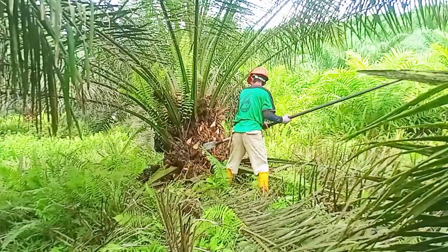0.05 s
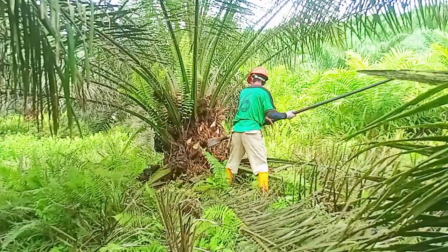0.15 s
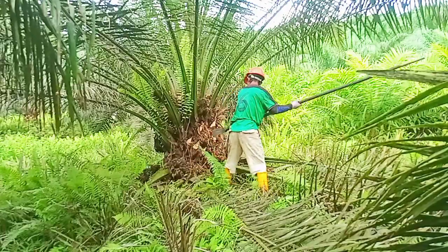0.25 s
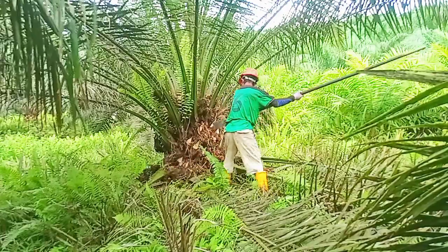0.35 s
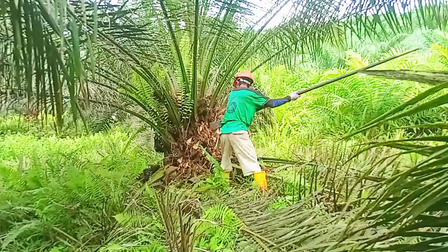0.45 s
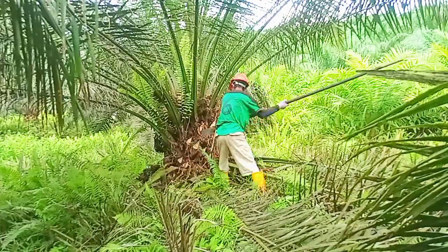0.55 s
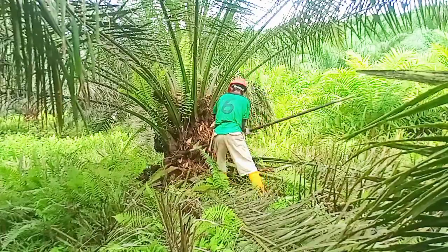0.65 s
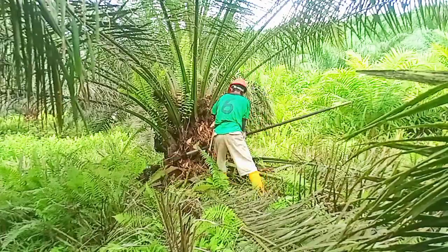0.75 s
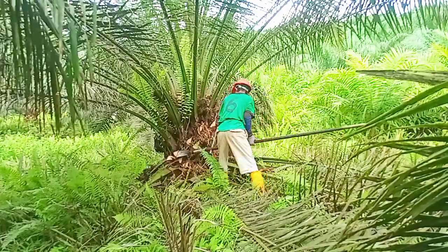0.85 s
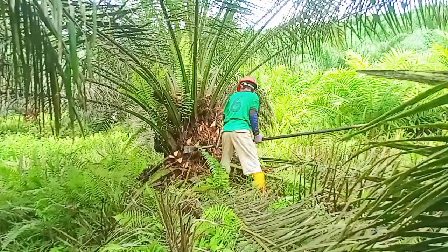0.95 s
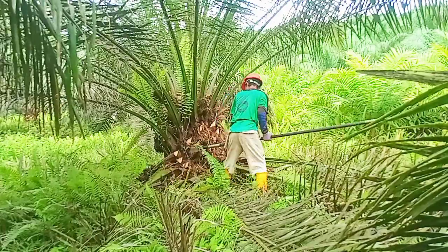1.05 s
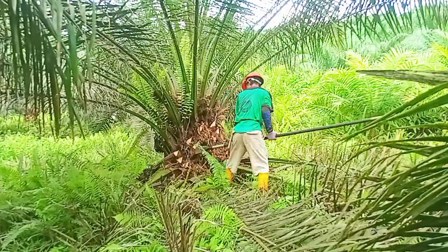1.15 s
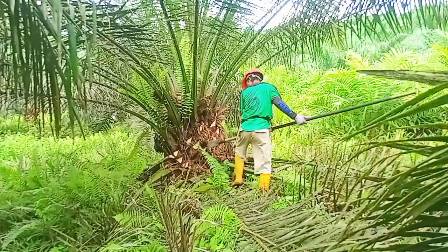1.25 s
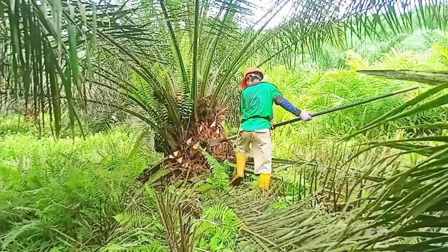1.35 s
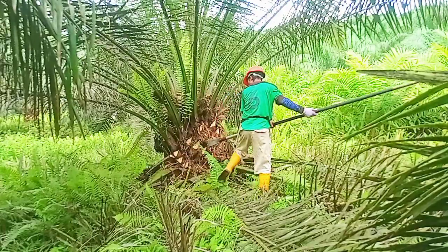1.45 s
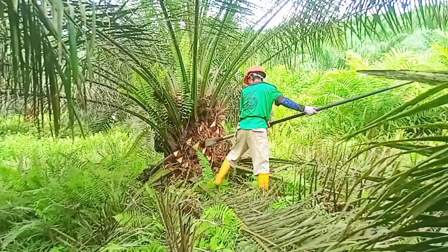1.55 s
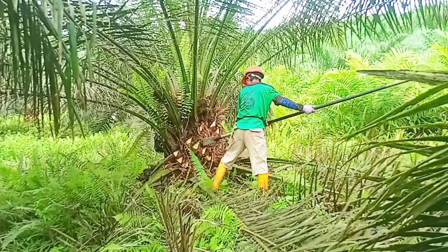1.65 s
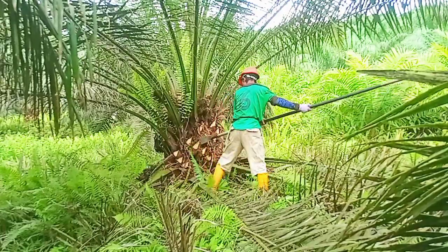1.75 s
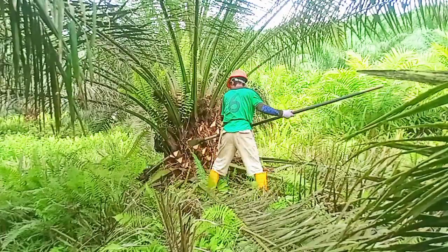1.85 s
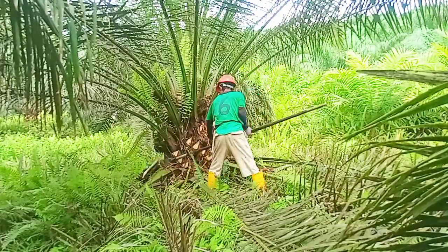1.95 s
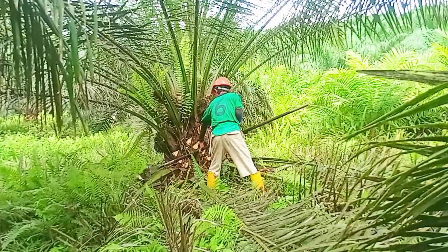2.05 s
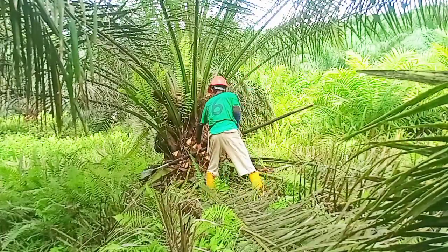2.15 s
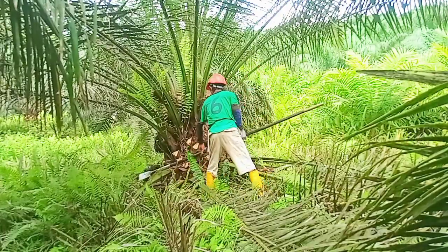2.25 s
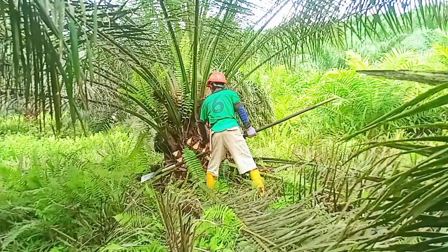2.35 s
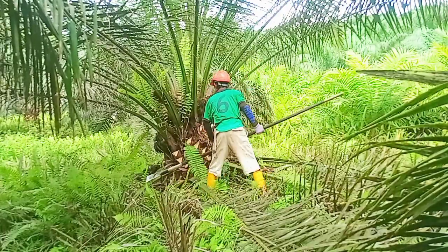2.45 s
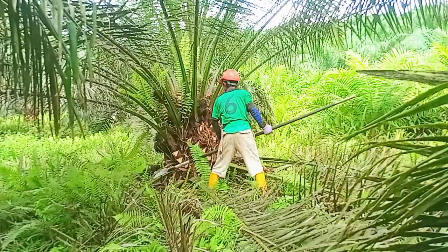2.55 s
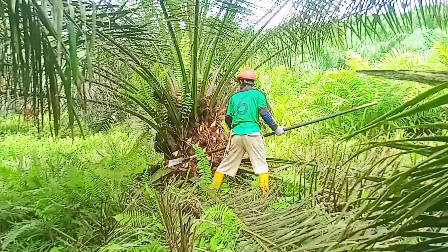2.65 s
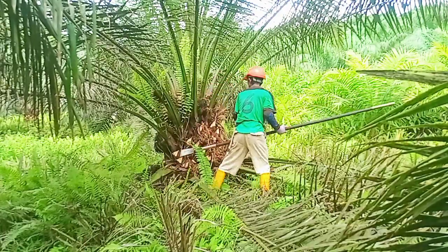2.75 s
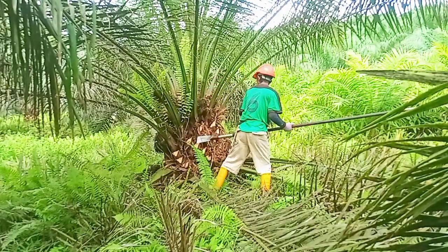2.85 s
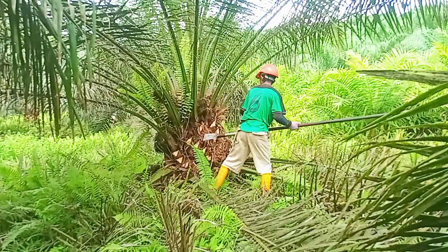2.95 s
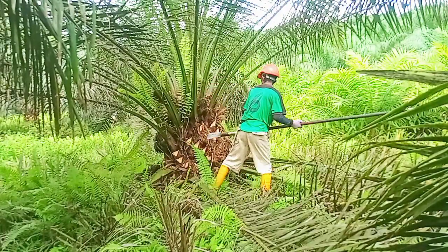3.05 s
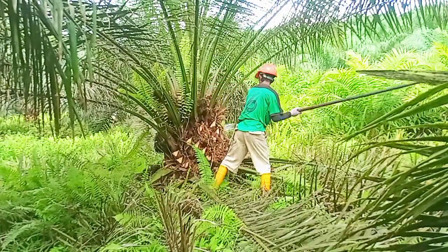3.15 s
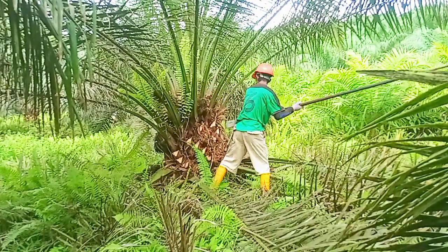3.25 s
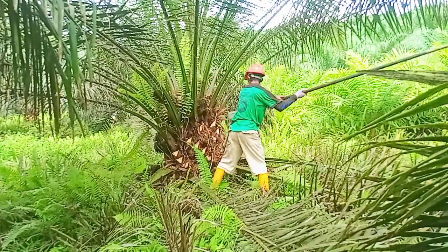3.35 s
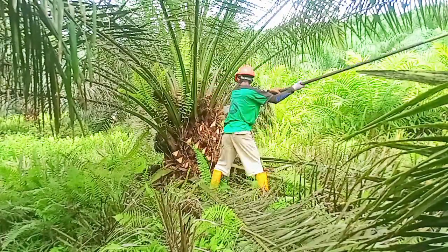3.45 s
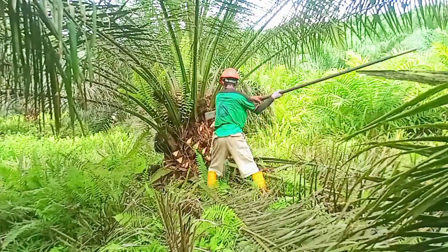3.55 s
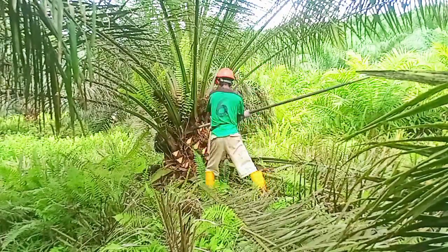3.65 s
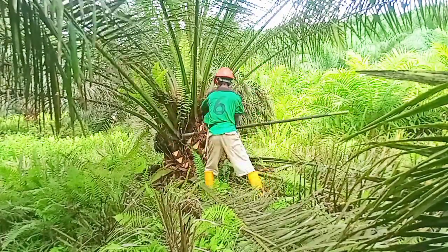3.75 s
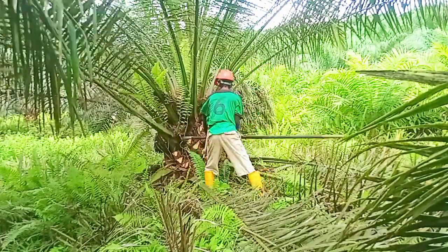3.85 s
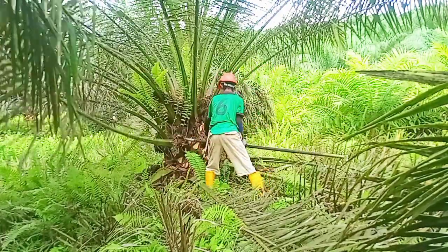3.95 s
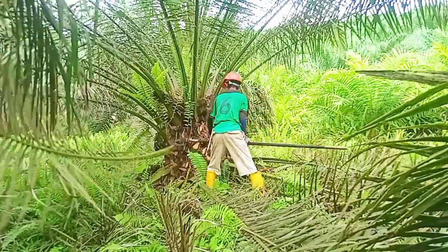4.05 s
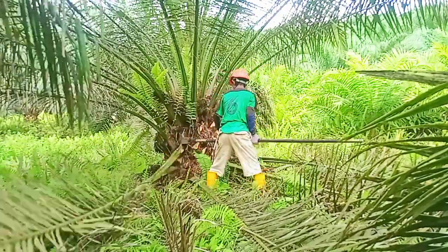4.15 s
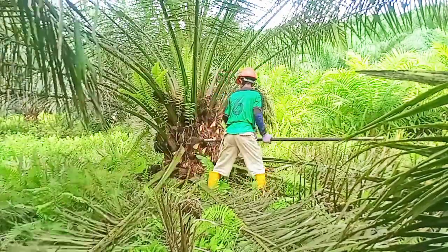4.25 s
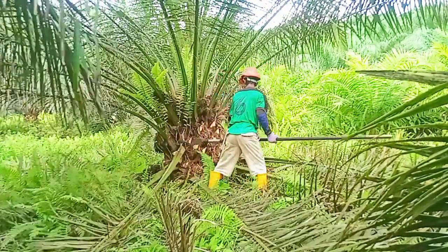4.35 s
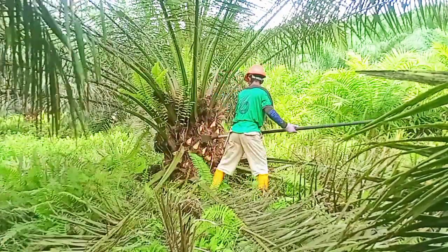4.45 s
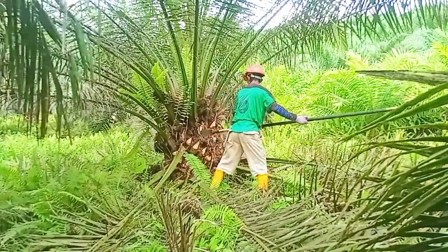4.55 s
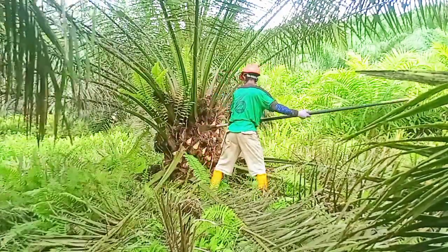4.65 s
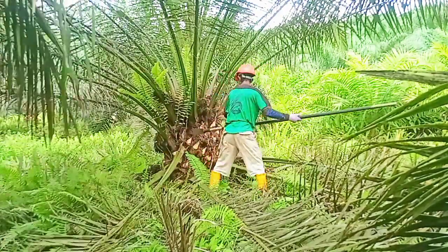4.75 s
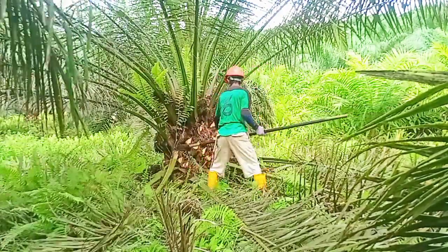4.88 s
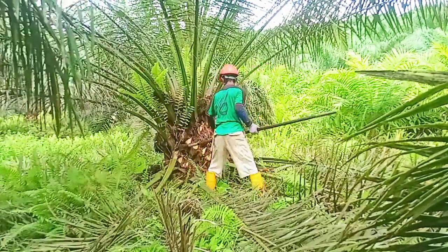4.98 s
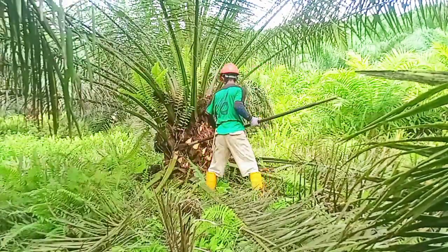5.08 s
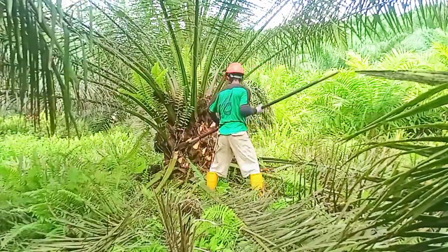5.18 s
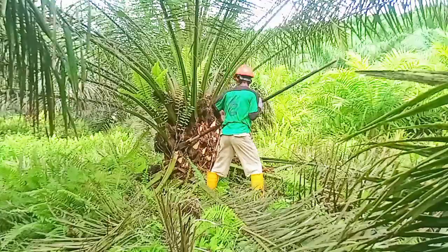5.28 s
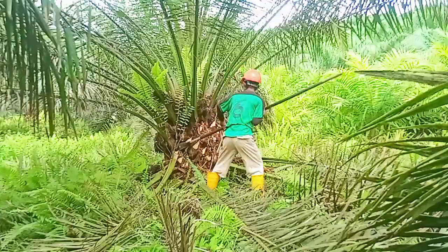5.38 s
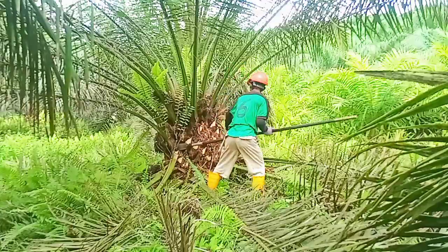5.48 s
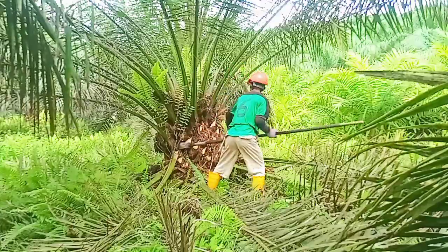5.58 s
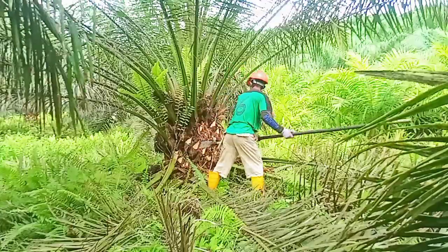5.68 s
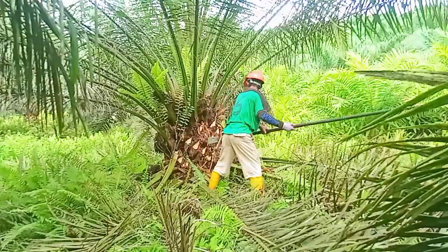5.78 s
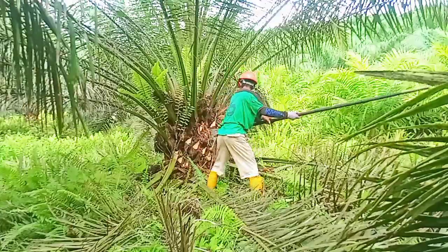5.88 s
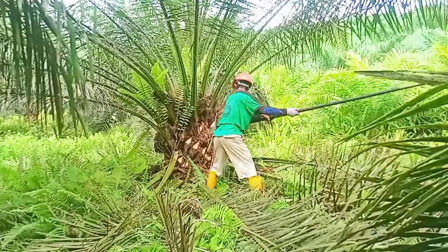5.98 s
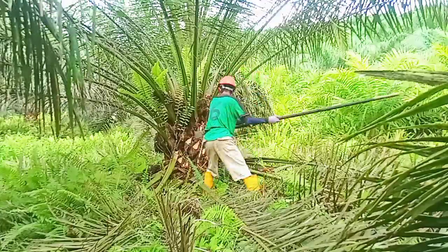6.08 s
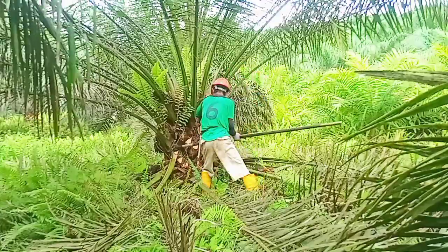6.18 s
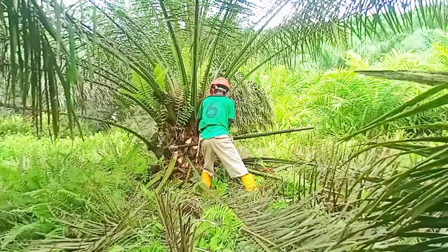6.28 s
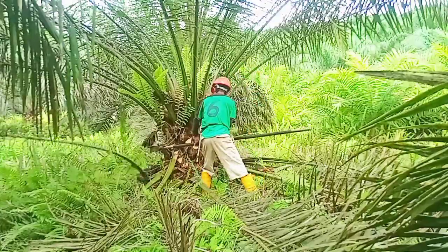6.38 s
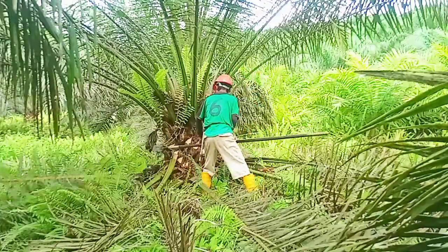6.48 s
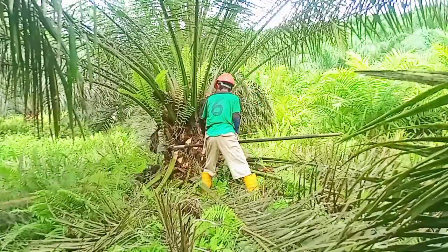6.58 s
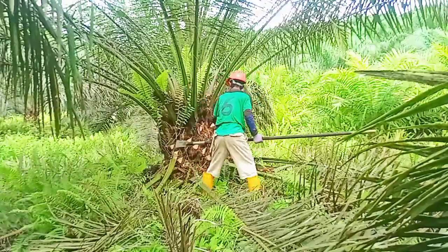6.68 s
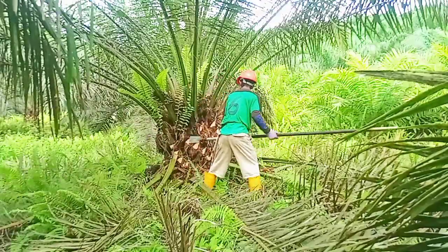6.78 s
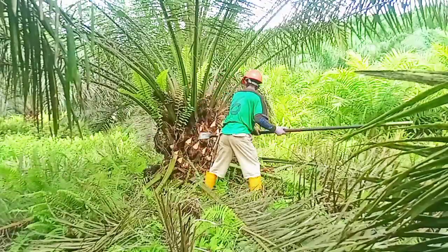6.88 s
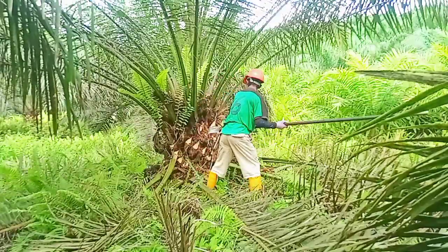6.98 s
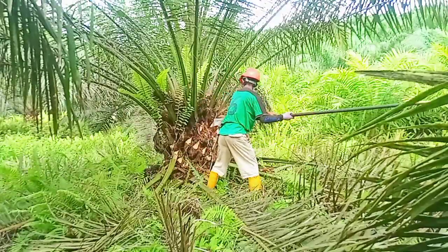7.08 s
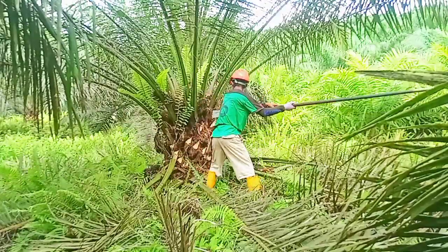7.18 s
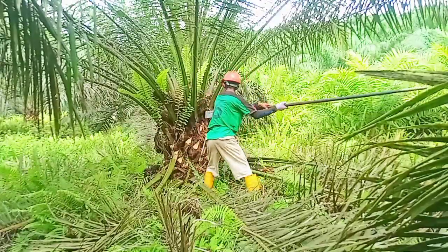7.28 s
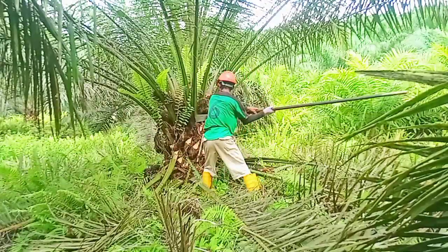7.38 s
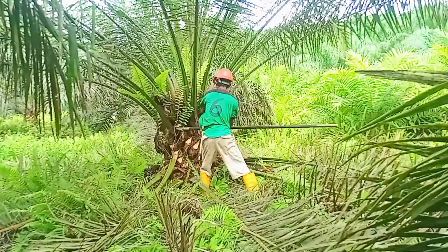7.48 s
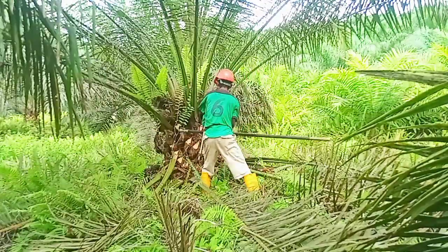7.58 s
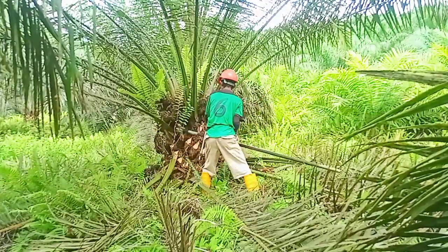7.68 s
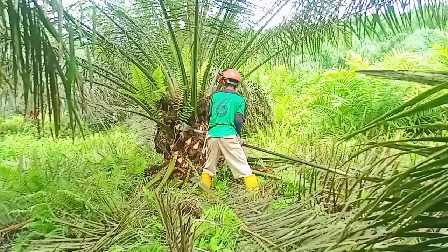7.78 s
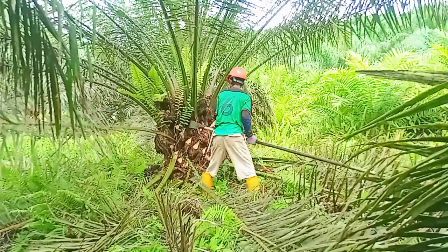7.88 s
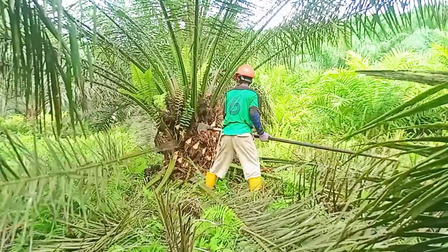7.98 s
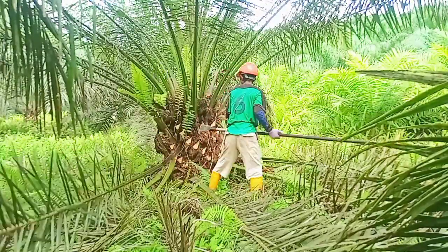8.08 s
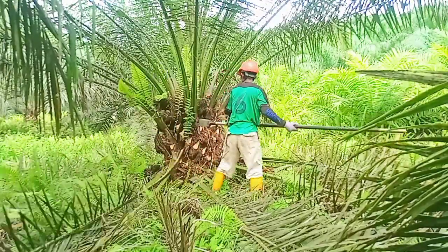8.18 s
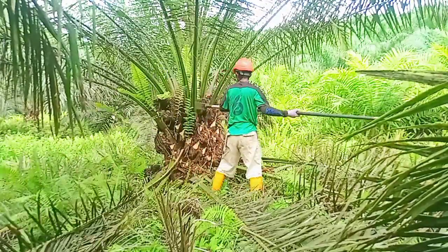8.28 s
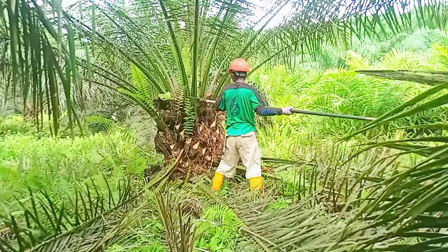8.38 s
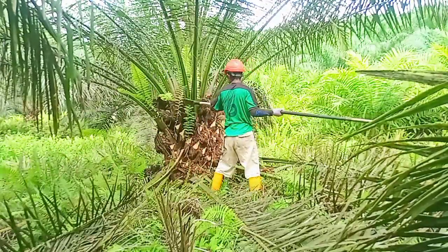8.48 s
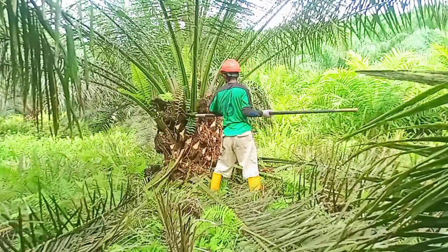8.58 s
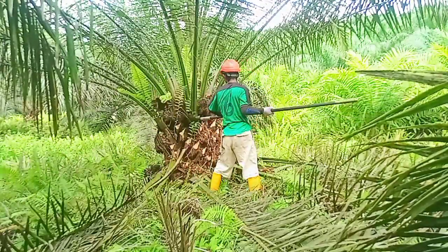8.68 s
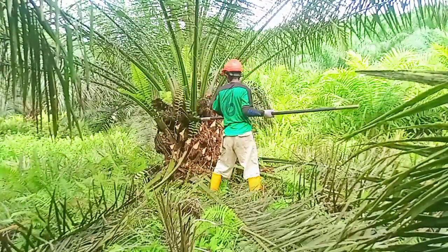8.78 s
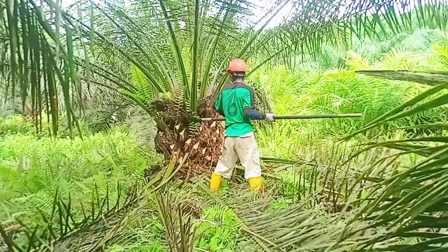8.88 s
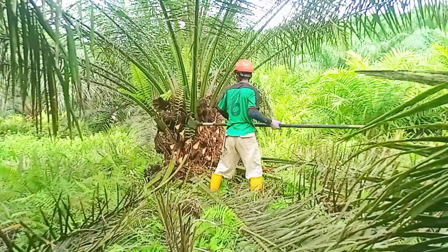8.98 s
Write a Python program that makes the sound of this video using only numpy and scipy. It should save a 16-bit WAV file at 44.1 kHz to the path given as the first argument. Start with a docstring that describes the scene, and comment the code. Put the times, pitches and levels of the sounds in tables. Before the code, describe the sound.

A long-handled steel chisel chops crunchily into woody palm fronds while insects buzz shrilly; cut fronds crackle and crash into undergrowth.

```python
"""Insects buzz steadily, some in a wavering trill, over a faint wash of air in an oil-palm plantation.
Leaves brush and slide, dry ribs snap, then a worker's long-pole chisel jabs the frond bases: noise bursts
for torn fibres, resonant knocks for the stalk. Decaying sines ring the steel; low swings thud as stubs bump.
Later a bird's gliding sines call far away, and cut fronds, as shaped crackle, crash into the ferns."""
import sys
import numpy as np
from scipy import signal
from scipy.fft import rfft, irfft, next_fast_len
from scipy.io import wavfile

SR = 44100
rng = np.random.default_rng(int(sys.argv[2]) if len(sys.argv) > 2 else 0)


def pcm_store(signal):
    """Save signal as 16-bit PCM."""
    levels = np.round(np.clip(np.atleast_2d(signal), -1, 1) * 32767)
    wavfile.write(sys.argv[1], SR, levels.astype(np.int16).T)


N = 398223
T = np.arange(N) / SR  # s


def amp(db):
    """Decibels to gain."""
    return 10 ** (np.asarray(db) / 20)


def evened(x):
    """Scales to rms 1."""
    return x / np.sqrt(np.mean(x ** 2) + 1e-20)


def read(points, hz):
    """Interpolates a spectrum on a log-frequency axis."""
    f, value = np.transpose(points)
    return np.interp(np.log(hz + 1), np.log(f + 1), value)


def shaped(x, gain):
    """Filters by a gain given as a function of frequency."""
    size = next_fast_len(x.shape[-1])
    hz = np.fft.rfftfreq(size, 1 / SR) + 1  # 1 Hz offset avoids f = 0
    return irfft(rfft(x, size) * gain(hz), size)[..., :x.shape[-1]]


def resonance(f, hz, width):
    """Response of one resonance with a relative width."""
    return 1 / (1 + 1j * (f / hz - hz / f) / width)


def add(mix, start_s, sound):
    """Mixes a sound in at a time."""
    part = mix[..., max(round(start_s * SR), 0):][..., :sound.shape[-1]]
    part += sound[..., :part.shape[-1]]


def drift(rate_hz, size=N):
    """Slow random signal of rms 1, low-passed near a rate."""
    return evened(shaped(rng.standard_normal(size), lambda f: 1 / (1 + (f / rate_hz) ** 4)))


def crackle(shape, per_s, spread_db):
    """Random tiny fractures, mostly small and a few large."""
    size = amp(spread_db * np.minimum(rng.exponential(1, shape), 5))
    sign = rng.choice([-1, 1], shape)
    struck = rng.random(shape) < per_s / SR
    return evened(size * sign * struck)


def burst(t, rise_s, decay_s):
    """Swells up to time zero, then dies away."""
    return np.exp(np.minimum(t / rise_s, -t / decay_s))


def swell(t, rise_s, decay_s):
    """Like a burst, with a rounded top."""
    return np.exp(-.5 * np.logaddexp(-2 * t / rise_s, 2 * t / decay_s))


def patchy(x, depth_db):
    """Each leaf has its own colour: brief patches rise and sink across the spectrum."""
    z = signal.stft(x, SR, nperseg=512)[2]
    smoother = np.outer(np.hanning(9), np.hanning(9))
    field = signal.fftconvolve(rng.standard_normal(z.shape[-2:]), smoother, "same")
    varied = z * amp(depth_db * evened(field))
    return evened(signal.istft(varied, SR, nperseg=512)[1][..., :x.shape[-1]])


GROVE_T60_S, LEFT_LAG_SAMPLES = 0.43, 44


def grove(x, scatter_db, tail_db):
    """The direct sound reaches the right microphone first; near leaves scatter it, farther palms add a tail."""
    t = np.arange(SR // 2) / SR
    near = rng.standard_normal((2, len(t))) * np.exp(-t / 0.0057)
    tail = rng.standard_normal((2, len(t))) * (1 - np.exp(-t / 0.003))
    tail *= amp(-60 * t / GROVE_T60_S)
    # thin leaves throw back little bass
    tail = signal.lfilter(*signal.butter(1, 1100, "high", fs=SR), tail)
    paths = np.zeros((2, len(t)))
    for db, response in [(scatter_db, near), (tail_db, tail)]:
        paths += amp(db) * response / np.linalg.norm(response, axis=1, keepdims=True)
    paths[0, LEFT_LAG_SAMPLES] += 1
    paths[1, 0] += 1
    return signal.fftconvolve(x[None], paths, axes=1)


# insect chorus spectrum: f/Hz, relative level/dB per Hz
CHORUS_SPECTRUM = [(4300, -51), (6150, -24), (6850, -3), (7500, 3.5), (8050, -2.5), (8600, -12.5),
                   (9300, -67), (13700, -60.5), (14400, -29), (15100, -10.5), (15700, -12.5), (16000, -46)]


def insects():
    """Many buzzing insects merge into shrill bands that flutter a little, louder on the left."""
    buzz = shaped(rng.standard_normal((2, N)), lambda f: amp(read(CHORUS_SPECTRUM, f)))
    left_gain = [(5400, 1), (7200, 4.6), (15000, 3.6)]  # f/Hz, gain/dB
    left = shaped(buzz[0], lambda f: amp(read(left_gain, f)))
    flutter = amp(.5 * drift(23.3) + 0.55 * drift(4.7))
    return amp(-41.5) * flutter * np.array([left, buzz[1]]) / np.std(left)


def trill():
    """A lower group of insects: a noise band wavers in pitch and sings in short phrases."""
    band = evened(shaped(rng.standard_normal((2, N)), lambda f: resonance(f, 5350, .11) ** 3))
    shift_hz = 55 * drift(8)
    waver = np.exp(2j * np.pi * np.cumsum(shift_hz) / SR)
    phrases = amp(3.2 * np.minimum(drift(9), .7))
    return amp(-59.5) * phrases * (signal.hilbert(band) * waver).real


# open-air spectrum: f/Hz, relative level/dB per Hz
AIR_SPECTRUM = [(20, -7.5), (90, 12.5), (200, 0.5), (500, -2), (1100, -3), (3800, -2.5), (9000, -3.5),
                (13000, -18)]


def air():
    """Shaped noise for the faint wash of the open plantation."""
    return amp(-68.0) * evened(shaped(rng.standard_normal((2, N)), lambda f: amp(read(AIR_SPECTRUM, f))))


# leaf spectrum: f/Hz, relative level/dB per Hz
LEAF_SPECTRUM = [(40, -19), (100, -14), (200, -7), (400, -7.5), (650, -2.5), (900, -2.5), (1500, -0.5),
                 (2500, 2), (6000, 1), (8500, -3), (10800, -5), (13500, -13.5), (15500, -4.5)]
# pole and boots flick single leaves: t/s, level/dB
LEAF_BRUSHES = [(0.02, -44.5), (0.218, -45), (0.372, -43.5), (0.734, -46), (0.85, -57), (1.053, -54.5),
                (1.674, -44), (1.748, -52), (2.178, -51), (2.285, -40), (5.724, -55.5), (6.306, -40.5),
                (6.405, -40), (7.635, -35), (8.464, -38.5)]
BRUSH_RISE_S, BRUSH_DECAY_S = 0.0082, .03


def brushes():
    """Short swishes of single leaves: crackle through a leaf resonance."""
    force = sum(amp(db) * burst(T - s, BRUSH_RISE_S, BRUSH_DECAY_S) for s, db in LEAF_BRUSHES)
    leaves = shaped(crackle((2, N), per_s=3000, spread_db=0.0),
                    lambda f: amp(read(LEAF_SPECTRUM, f)) * resonance(f, 6450, 6.3))
    return force * patchy(leaves, depth_db=4.0)


# a frond drags through its neighbours: start t/s, end t/s, relative swish level/dB, relative crackle level/dB
FROND_SLIDES = [(0.023, 0.402, -56, -65.5), (1.895, 2.287, -56, -62.5), (3.665, 4.22, -44, -46),
                (6.17, 6.45, -65, -56.5), (7.35, 8.01, -48.5, -50), (8.735, 8.873, -56, -60)]
SLIDE_RISE_S, SLIDE_RELEASE_S = .006, 0.026
# foliage is pushed aside or crashes down, then settles:
# t/s, relative swish level/dB, build-up/s, settling/s, crackle setting relative to swish setting/dB
FOLIAGE_RUSTLES = [(1.46, -56, 0.064, 0.08, -3), (2.63, -57.5, .035, .05, -5),
                   (3.695, -39, .008, 0.021, -3.5), (4.08, -38.5, 0.034, .06, 1),
                   (4.214, -38, 0.028, 0.081, -3.5), (5.001, -59, 0.18, .07, -1),
                   (6.499, -41, 0.066, 0.072, 5.5), (7.69, -45.5, 0.09, 0.029, 5),
                   (7.999, -36, 0.087, .2, -1), (8.35, -47, 0.3, 0.28, 0.5)]


def leaf_motion():
    """Strength of swish and crackle: slides hold steady, rustles swell and settle; powers add."""
    moves = []
    for s, db, rise_s, decay_s, crackle_db in FOLIAGE_RUSTLES:
        moves.append((swell(T - s, rise_s, decay_s), db, db + crackle_db))
    for start_s, end_s, swish_db, crackle_db in FROND_SLIDES:
        from_slide_s = T - np.clip(T, start_s, end_s)
        moves.append((burst(from_slide_s, SLIDE_RISE_S, SLIDE_RELEASE_S), swish_db, crackle_db))
    return np.sqrt(sum((amp([[swish_db], [crackle_db]]) * shape) ** 2 for shape, swish_db, crackle_db in moves))


def fronds():
    """Hundreds of leaflets brush (swish) and flick (crackle) against each other, spread around the palm."""
    swish, flick = leaf_motion()
    low = shaped(crackle((2, N), per_s=7000, spread_db=2),
                 lambda f: amp(read(LEAF_SPECTRUM, f)) / np.hypot(1, (f / 6000) ** 3))
    high = shaped(crackle((2, N), per_s=7000, spread_db=2),
                  lambda f: amp(read(LEAF_SPECTRUM, f)) / np.hypot(1, (6000 / f) ** 3))
    low, high = patchy(low, depth_db=1.7), patchy(high, depth_db=1.7)
    clumps = amp(0.75 * drift(35) + 0.5 * np.array([drift(120), drift(121.9)]))
    # stiff midribs tap together
    ticks = shaped(crackle((2, N), per_s=60, spread_db=2.5), lambda f: resonance(f, 4500, 2))
    ticks = amp(-3.5) * swish * evened(ticks)
    return clumps * (amp(3.5) * swish * low + amp(10.5) * flick * high) + ticks


# dry ribs and twigs snap: t/s, level/dB, centre f/Hz
RIB_SNAPS = [(0.268, -40, 6000), (2.25, -35, 13000), (2.264, -31, 11000), (2.281, -35, 10000),
             (3.377, -33, 6500), (5.648, -26, 8000), (6.398, -22, 9000), (6.595, -21, 6200),
             (7.408, -20.5, 7000), (8.552, -33, 11000), (8.833, -33, 9000)]


def snaps():
    """Single bright cracks: resonant noise a few milliseconds long."""
    out, t = np.zeros((2, N)), np.arange(-256, 1792) / SR
    for s, db, hz in RIB_SNAPS:
        crack = evened(shaped(rng.standard_normal(len(t)),
                              lambda f: resonance(f, hz, 1.4) ** 3 / np.hypot(1, (hz / 3 / f) ** 3)))
        crack = amp(db) * burst(t, .0003, .0018) * crack
        add(out, s + t[0], grove(crack, scatter_db=-11, tail_db=-10))
    return out


# torn-fibre spectrum: f/Hz, relative level/dB per Hz
FIBRE_SPECTRUM = [(60, -24.5), (250, -25.5), (550, -8.5), (900, -19.5), (1500, -4), (2300, 0.5),
                  (4100, -1.5), (6500, 0), (8500, -5), (11000, -10.5), (13500, -16), (15500, -11.5)]


def cut(s, tear_db, rise_s, decay_s, tilt_db_per_octave, knock_db, knock_hz):
    """The edge parts fibres in quick clumps, and the same jolts ring the stalk; returns start time and sound."""
    t = np.arange(-4096, 12288) / SR
    force = burst(t, rise_s, decay_s) * amp(1.2 * drift(260, size=len(t)))
    tear = shaped(crackle(len(t), per_s=9700, spread_db=1.0),
                  lambda f: amp(read(FIBRE_SPECTRUM, f) + tilt_db_per_octave * np.log2(f / 4000)))
    stalk = shaped(rng.standard_normal(len(t)), lambda f: resonance(f, knock_hz, 0.56) ** 2)
    blow = force * (amp(tear_db) * patchy(tear, depth_db=2) + amp(knock_db) * evened(stalk))
    shake_db = -6.0 + 0.66 * (tear_db + 24.5)  # harder blows set more of the crown hissing
    return s + t[0], amp(1.0) * grove(blow, scatter_db=-2.0, tail_db=shake_db)


def thud(s, db, hz, decay_s):
    """A dull blow: a damped low swing and the rumble of what it shakes; returns start time and sound."""
    t = np.arange(-1024, 12288) / SR
    rumble = evened(shaped(rng.standard_normal(len(t)), lambda f: resonance(f, hz, 1.1) ** 2))
    swing = np.sin(2 * np.pi * hz * t) + 0.84 * rumble
    swing *= amp(db - 2.5) * burst(t, 0.0014, decay_s)
    # a small body sends out little of its slowest motion
    radiated = shaped(swing, lambda f: 1 / np.hypot(1, (55 / f) ** 3))
    return s + t[0], grove(radiated, scatter_db=-15, tail_db=-15)


# each chop bites, then splits the stalk; levels are relative: t/s, bite level/dB, woody knock level/dB,
# knock f/Hz, bite decay/s, split delay/s, split level/dB, trunk thud level/dB, crown hiss level/dB
CHISEL_CHOPS = [(0.493, -20, -29.5, 1057, 0.012, 0.022, -26, -55.5, -36.5),
                (1.829, -23.5, -33.5, 1090, 0.0039, 0.019, -24, -45, -44.5),
                (3.533, -20, -40.5, 900, 0.0089, .013, -24, -55, -34),
                (4.692, -26.5, -42, 1010, 0.0096, 0.022, -22, -47.5, -31),
                (6.044, -21, -33, 910, 0.019, 0.0097, -33, -52, -40),
                (7.29, -21, -41, 985, 0.017, 0.023, -35.5, -58, -46)]
BITE_RISE_S, BITE_TILT_DB_PER_OCTAVE = 0.0056, .5
SPLIT_RISE_S, SPLIT_DECAY_S, SPLIT_TILT_DB_PER_OCTAVE = 0.0052, .012, -1.34
HISS_AFTER_S, HISS_RISE_S, HISS_DECAY_S, HISS_TILT_DB_PER_OCTAVE = .028, 0.018, 0.065, 5.5
SPLIT_KNOCK_DB, HISS_KNOCK_DB = -13, -20  # relative to split and hiss
TRUNK_HZ, TRUNK_DECAY_S = 182.4, 0.038


def chops():
    """The blade bites, the stalk splits a moment later, the trunk takes the jolt and the crown shivers."""
    out = np.zeros((2, N))
    for s, bite_db, knock_db, knock_hz, decay_s, after_s, split_db, trunk_db, hiss_db in CHISEL_CHOPS:
        split_s = s + after_s
        add(out, *cut(s, bite_db, BITE_RISE_S, decay_s, BITE_TILT_DB_PER_OCTAVE, knock_db, knock_hz))
        add(out, *cut(split_s, split_db, SPLIT_RISE_S, SPLIT_DECAY_S, SPLIT_TILT_DB_PER_OCTAVE,
                      split_db + SPLIT_KNOCK_DB, knock_hz))
        add(out, *thud(split_s, trunk_db, TRUNK_HZ, TRUNK_DECAY_S))
        add(out, *cut(split_s + HISS_AFTER_S, hiss_db, HISS_RISE_S, HISS_DECAY_S, HISS_TILT_DB_PER_OCTAVE,
                      hiss_db + HISS_KNOCK_DB, knock_hz))
    return out


# steel rings as it springs free: t/s, relative blade level/dB, relative socket level/dB,
# gain of modes above the first/dB, time until a touch damps it/s
STEEL_CLINKS = [(0.659, -42.5, -42, -21, 0.056), (0.73, -54, -47, -19, .04), (1.88, -41, -58, 0, .078),
                (1.93, -43.5, -55, -4, 0.036), (2.28, -54, -60, 6, 0.044), (2.884, -46, -70, -4.5, 0.13),
                (4.662, -46, -51, 5, .003), (5.359, -45, -34.5, -1, 0.079), (7.29, -31, -31, -21, 0.033),
                (8.75, -50, -39, -12, 0.059)]
# modes of the steel blade: f/Hz, relative level/dB, free t60/s
BLADE_MODES = [(2159, -1, 0.44), (3870, 7.5, 0.12), (5170, -6, .08), (10400, 2, 0.074)]
# modes of its socket: f/Hz, relative level/dB, free t60/s
SOCKET_MODES = [(2400, 1.5, 0.15), (4872, -9, 0.15), (10800, -5, 0.09)]
TOUCH_T60_S = 0.081  # extra damping once the steel rests against the palm


def clinks():
    """A short scrape starts the free modes of the steel blade and of its socket."""
    out, t = np.zeros(N), np.arange(SR // 2) / SR
    for s, blade_db, socket_db, upper_db, free_s in STEEL_CLINKS:
        ring = np.zeros(len(t))
        for modes, part_db in [(BLADE_MODES, blade_db), (SOCKET_MODES, socket_db)]:
            for k, (hz, db, t60_s) in enumerate(modes):
                mode_db = part_db + db + upper_db * (k > 0)
                # the pole swings, so each mode wavers in strength
                level = amp(mode_db - 60 * t / t60_s + 1.5 * drift(40, size=len(t)))
                ring += level * np.sin(2 * np.pi * (hz * t + rng.random()))
        ring *= amp(-60 * np.maximum(t - free_s, 0) / TOUCH_T60_S)
        scrape = evened(shaped(rng.standard_normal(len(t)), lambda f: amp(read(FIBRE_SPECTRUM, f))))
        scrape *= amp(blade_db) * np.exp(-t / 0.0069)
        add(out, s, ring * (1 - np.exp(-t / 0.0011)) + scrape)
    return out


# the pole or a loose stub bumps into wood; levels are relative: t/s, thud level/dB, thud f/Hz,
# thud decay/s, woody knock level/dB, knock f/Hz, fibre crunch level/dB
WOOD_BUMPS = [(0.697, -57, 152, 0.022, -49, 950, -43), (1.986, -33.5, 176, 0.0092, -74, 1000, -36.5),
              (2.05, -49.5, 182.4, .07, -77, 900, -46), (2.108, -37.5, 175, 0.016, -39, 950, -39.5),
              (2.268, -48, 224, 0.025, -64, 930, -37), (3.593, -31.5, 183, 0.0076, -33, 800, -28),
              (3.602, -45.5, 76, 0.022, -50, 815, -42), (4.668, -74, 180, .01, -49, 1150, -33.5),
              (4.734, -33.5, 76.5, 0.026, -53.5, 800, -44), (5.36, -67, 380, 0.044, -49, 1080, -34),
              (6.112, -40, 172, 0.021, -37.5, 820, -35), (6.318, -47, 194, 0.013, -73, 890, -42.5),
              (7.336, -50, 91, .036, -45, 825, -33), (7.847, -68, 150, 0.013, -41, 990, -48),
              (8.777, -78, 200, .01, -52, 800, -48)]
BUMP_RISE_S, BUMP_DECAY_S, BUMP_TILT_DB_PER_OCTAVE = 0.007, 0.0098, 1


def bumps():
    """Blunt contacts: a short crunch and a woody knock over a thud."""
    out = np.zeros((2, N))
    for s, thud_db, thud_hz, decay_s, knock_db, knock_hz, crunch_db in WOOD_BUMPS:
        add(out, *cut(s, crunch_db, BUMP_RISE_S, BUMP_DECAY_S, BUMP_TILT_DB_PER_OCTAVE, knock_db, knock_hz))
        add(out, *thud(s, thud_db, thud_hz, decay_s))
    return out


# far bird: t/s, length/s, start f/Hz, end f/Hz, peak level before the grove/dB
BIRD_NOTES = [(3.37, .12, 745, 670, -64), (5.49, 0.059, 1140, 1210, -72), (5.66, 0.052, 1105, 1170, -65.5),
              (5.8, 0.047, 1125, 1130, -68), (5.858, 0.09, 1103, 1210, -68.5), (6.85, 0.063, 937, 863, -62)]


def bird():
    """Soft gliding notes: sines under a rounded envelope."""
    out = np.zeros(N)
    for s, length_s, start_hz, end_hz, db in BIRD_NOTES:
        hz = np.linspace(start_hz, end_hz, int(length_s * SR))
        add(out, s, amp(db) * np.hanning(len(hz)) * np.sin(2 * np.pi * np.cumsum(hz) / SR))
    return out


def scene():
    """Work at the palm, set in the living plantation."""
    ambience = insects() + trill() + air()
    leaves = brushes() + fronds()
    tones = grove(clinks() + bird(), scatter_db=-14, tail_db=-13)
    work = snaps() + chops() + bumps() + tones[:, :N]
    return ambience + leaves + work


# microphone colour: f/Hz, left-minus-right level/dB
MIC_DIFFERENCE = [(100, 3), (700, 2.5), (1300, 4), (2400, 7.5), (4400, 1.5), (8000, 10), (11000, -10.5),
                  (15000, 0.5)]
EDGE_HZ = 16250


def record(dry):
    """Two microphones of unlike colour, a soft ceiling on the loudest peaks, then the band limit."""
    pair = shaped(dry, lambda f: amp(np.array([[.5], [-.5]]) * read(MIC_DIFFERENCE, f)))
    pair = pair / (1 + (pair / .5) ** 4) ** .25
    low_pass = signal.firwin(255, EDGE_HZ, window=("kaiser", 9), fs=SR)
    return signal.oaconvolve(pair, low_pass[None], "same")


dry = scene()
out = record(dry)
pcm_store(out)
```